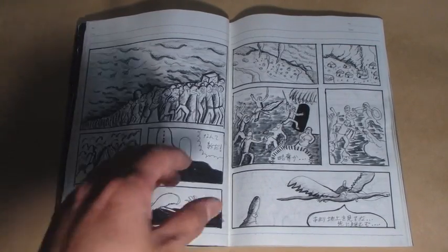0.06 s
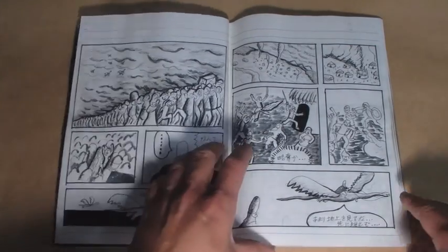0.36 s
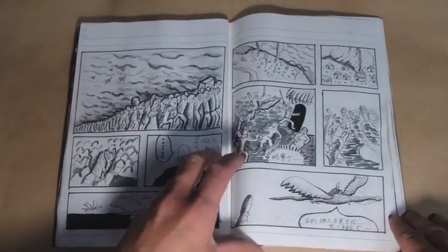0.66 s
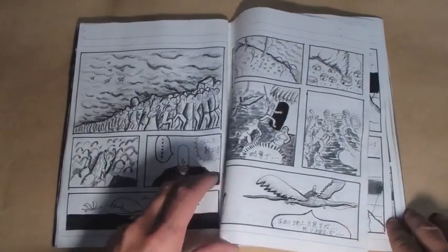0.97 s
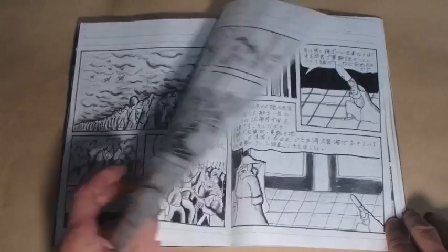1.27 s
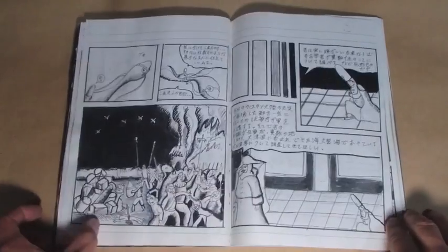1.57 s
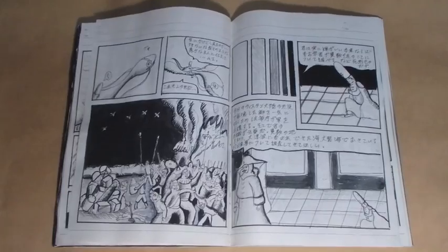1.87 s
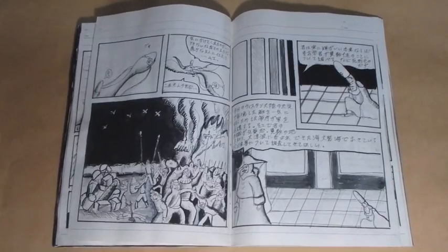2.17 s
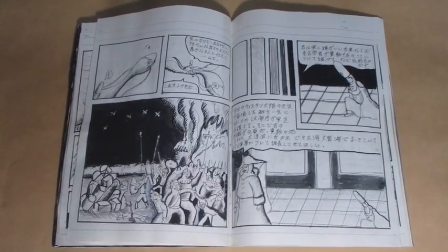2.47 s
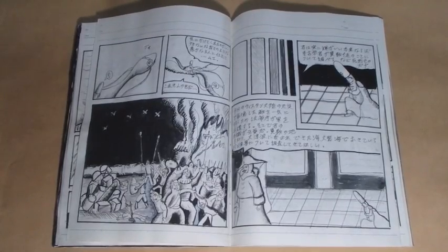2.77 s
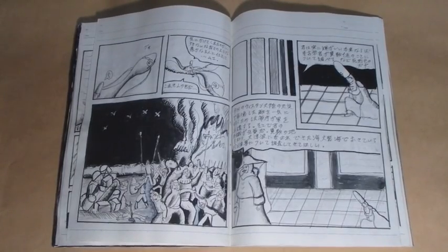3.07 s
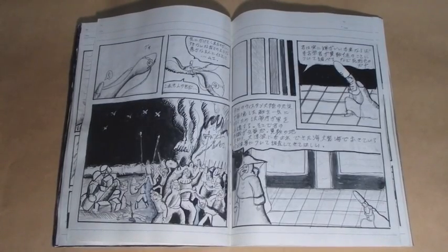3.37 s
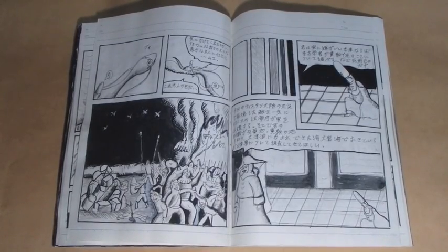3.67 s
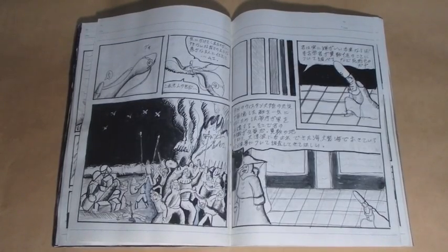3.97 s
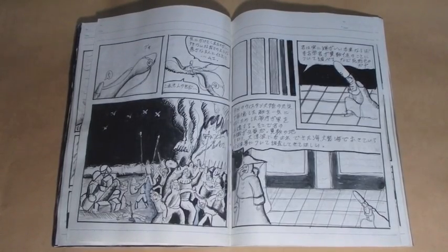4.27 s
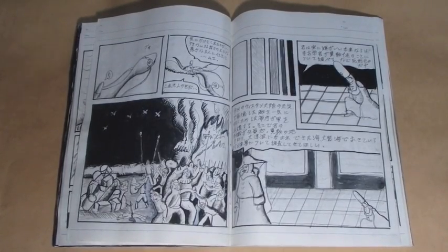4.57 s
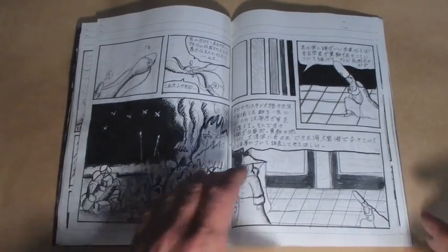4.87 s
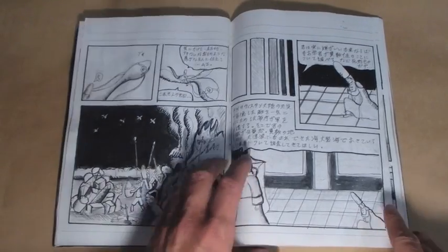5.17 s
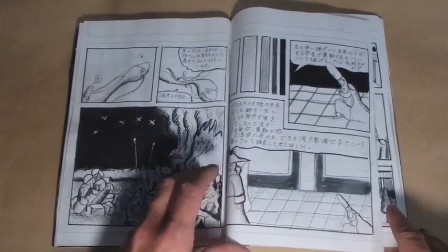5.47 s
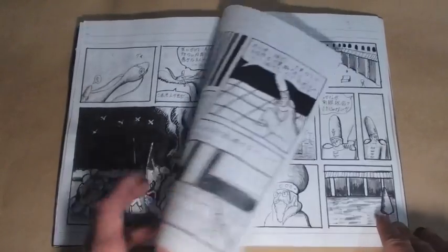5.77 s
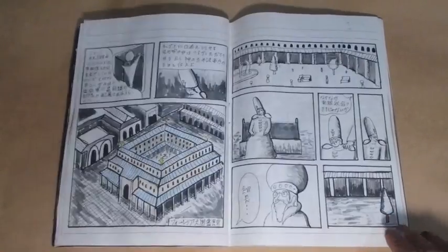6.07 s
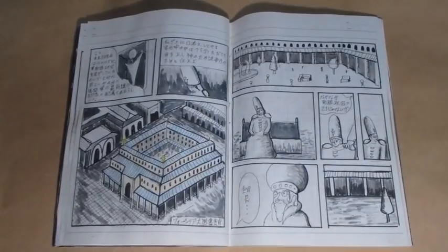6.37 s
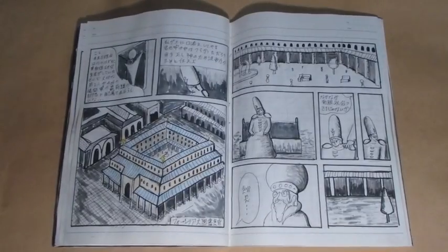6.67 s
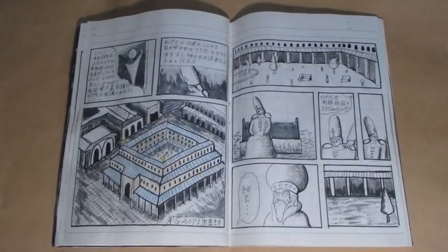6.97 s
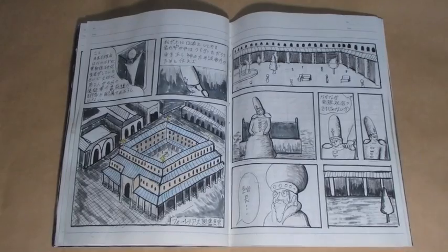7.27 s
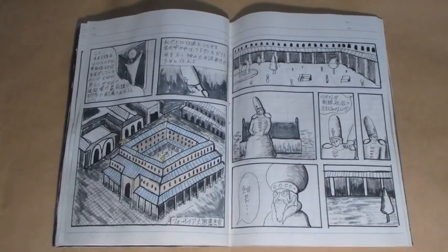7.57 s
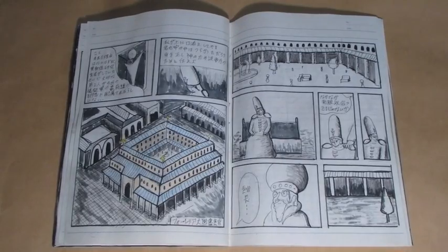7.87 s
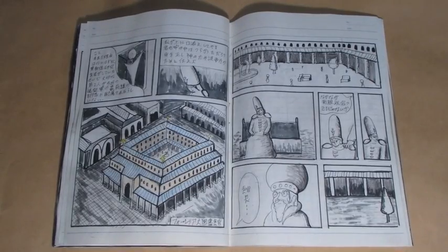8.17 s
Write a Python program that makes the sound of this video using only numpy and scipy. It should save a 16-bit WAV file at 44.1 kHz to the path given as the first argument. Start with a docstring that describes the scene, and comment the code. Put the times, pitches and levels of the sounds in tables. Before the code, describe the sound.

Two paper notebook pages are turned up close with crisp snaps and crackle, with faint camera focus ticking between them over a low room hum.

```python
"""Over the low hum of a small quiet room, a notebook page is turned on a table, close to a camera.
The sheet slides, buckles with sharp snaps and fine crackle, lands at 1.6 s and settles.
The camera's focus drive ticks faintly until a second page is turned, from about 5.3 s to 6.2 s.
The ticking then resumes, and a distant rumble swells towards the end."""
import sys
import numpy as np
from scipy import signal
from scipy.fft import rfft, irfft, next_fast_len
from scipy.io import wavfile
from scipy.ndimage import uniform_filter1d, map_coordinates

SR = 44100
rng = np.random.default_rng(int(sys.argv[2]) if len(sys.argv) > 2 else 0)


def dump_mix(stems):
    """Bounce the given channels to the path in sys.argv[1] as a 16-bit WAV at rate SR."""
    frames = np.atleast_2d(stems).T  # one column per channel
    limited = np.clip(frames, -1, 1)  # hard clip at full scale
    pcm = np.round(limited * 32767).astype(np.int16)
    wavfile.write(sys.argv[1], SR, pcm)


N = 362785
TIME = np.arange(N) / SR

# Page turns. Each row: times of grip, lift, swing and landing in seconds, seconds pressed flat,
# then relative levels in dB of bending in the grip, bending in the swing and sliding.
TURNS = [(0.57, 1.048, 1.3, 1.581, 0.029, -52, -33, -41), (5.28, 5.804, 5.96, 6.17, 0.067, -48, -35.5, -42)]
# Coherence of the paper's sound. Each row: frequency in Hz, left-right correlation.
PAPER_COHERENCE = [(500, 1), (2000, 1), (3500, 0.37), (6000, 0.15), (12000, 0.18)]
# Coherence of the background. Each row: frequency in Hz, left-right correlation.
AIR_COHERENCE = [(60, 0.68), (150, 0.78), (380, 0.53), (950, 0.32), (2380, 0.19), (5980, 0.032),
                 (15000, 0.02)]


def snaps(ring_db, flap_db, crack_db, shiver_db, size=4096):
    """Snap-through buckling: the curved sheet pops, rings, cracks and flaps into the page stack."""
    # Each row: start in seconds, relative level in dB, then flap and crack in dB against that level.
    buckles = [(0.5432, -30.5, -7, -11), (0.575, -17.5, -13.5, -26), (0.611, -20, -10, -16),
               (0.659, -30.5, -5, -22), (0.74, -33, -13, -3.5), (0.9658, -27.5, -4.5, -3.5),
               (1.0314, -25, -11.5, -22), (1.0727, -14.5, -21, -7.5), (1.131, -26, -4.5, -24),
               (1.151, -29.5, -3, -19), (1.252, -27, -6.5, -23), (1.261, -15, -17, -33),
               (1.269, -20, -5, -25), (1.292, -26.5, -3.5, -11), (1.3065, -7.5, -27, -9),
               (1.343, -22, -21, -16), (1.363, -20.5, -9, -17), (1.403, -21, -14, -10.5),
               (1.46, -28, -3, -15), (1.469, -25, -1.5, -27), (1.5187, -20.5, -24, 2),
               (1.5328, -13, -17.5, -4.5), (1.554, -19, -20, -9), (1.612, -26, -10, -16),
               (1.647, -16, -16, -20), (1.653, -16.5, -14, -9.5), (1.6635, -17.5, -10.5, -12),
               (1.7029, -11.5, -22, -16), (1.718, -21, -9.5, -20), (1.7353, -10.5, -20, -4),
               (1.91, -12, -18, -28), (1.99, -22, -4.5, -39), (2.124, -45.5, 1, -29),
               (5.242, -32.5, -12, -13), (5.278, -38, 3.5, -11), (5.2878, -32.5, -2, -26),
               (5.303, -32.5, -7, -23), (5.327, -37, 5.5, -17), (5.339, -15, -16.5, -30),
               (5.3603, -19, -9, -16), (5.391, -29.5, -8, -25), (5.408, -35.5, 4, -20),
               (5.7587, -20.5, -13, -16), (5.8003, -27.5, -7, -29), (5.8233, -22, -9, -42),
               (5.855, -33, -10, -30), (5.869, -21.5, -8.5, -36), (5.877, -19.5, -9, -29),
               (5.892, -10, -11, -18.5), (5.898, -18.5, -25, -27), (5.9149, -7.5, -18, -10),
               (6.0851, -26, -15, -33), (6.167, -26.5, -23, -14), (6.186, -24.5, -28, -16),
               (6.2065, -16.5, -34, -28), (6.2305, -26, -21, -22), (6.251, -27, -17, -29),
               (6.262, -23.5, -9, -37), (6.2939, -15.5, -15, -26), (6.2994, -9, -23, -13)]
    # Spectra of the sheet and of a snap's sharp edge. Each row: frequency in Hz, gain in dB.
    paper_spectrum = [(88, -47), (150, -18), (189, -15), (318, -15), (525, -3.5), (818, -6), (1070, -7),
                      (2700, 2), (3030, -3), (3750, -4.5), (4540, -17.5), (5200, -5.5), (6300, -25),
                      (10400, -19), (15000, -42.5)]
    crack_spectrum = [(2500, -79), (4400, -3.5), (5300, 10), (7500, 0), (10500, -6.5), (12000, -13.5),
                      (15000, -18)]
    snap_emphasis = [(300, -14.5), (600, -13), (900, -6.5), (1350, 4), (2600, -5), (3300, 1),
                     (3900, 2), (5200, -8.5), (9000, -34.5)]
    # Modes of the page stack on the table. Each row: frequency in Hz, width in Hz, gain in dB.
    stack_modes = [(310, 124, -12.5), (608, 74, -9.5), (822, 260, 2.5), (1333, 370, 0)]
    held_t60_s, free_t60_s = 0.023, 0.042
    typical_db, t60_halving_db = -21.5, 31
    resonance_db, resonance_octaves = 14.5, 0.68
    hz = np.fft.rfftfreq(size, 1 / SR)
    octave = np.log2(hz + 1)
    stack_gain = sum(amp(db) / (1 + ((hz - f) / (width / 2)) ** 2) for f, width, db in stack_modes)
    stack = 20 * np.log10(stack_gain)
    sheet = along(paper_spectrum, hz) + along(snap_emphasis, hz)
    out = np.zeros(N)
    for s, db, flap, crack in list(buckles) + creases():
        # Softer cracks ring lower, as do wide buckles, which flap more.
        ring_hz = 2736 * 2 ** (0.0075 * crack - 0.0055 * flap)
        resonance = resonance_db * np.exp(-((octave - np.log2(ring_hz)) / resonance_octaves) ** 2)
        ring_t60 = held_t60_s + (free_t60_s - held_t60_s) * freedom(s)
        ring_t60 *= 2 ** ((typical_db - db) / t60_halving_db)  # a harder pop is over sooner
        ripple_db = 0.04 * map_coordinates(rng.standard_normal(80), [5 * octave])
        ring = struck(kick(ring_t60, slips_db=8), sheet + resonance + ripple_db)
        thud = struck(kick(t60=0.045, slips_db=8), stack + ripple_db)
        edge = struck(kick(t60=0.011, slips_db=5), along(crack_spectrum, hz))
        shiver = struck(kick(t60=0.1, slips_db=25), sheet)  # bending waves cross the whole sheet
        pop = amp(ring_db) * ring + amp(flap + flap_db) * thud + amp(shiver_db) * shiver
        add(out, s, amp(db) * pop)
        # The crack comes a moment later, as the buckle passes its tightest bend.
        add(out, s + 0.0005, amp(db + crack + crack_db) * edge)
    return out


def creases(per_second=15, scatter_db=3):
    """Small buckles grow with the bending. Each row: start in seconds, level, flap and crack in dB."""
    typical_crease_db, typical_bend_db = -42.5, -44.5
    rows = []
    for turn in TURNS:
        grip, _, _, land = turn[:4]
        bend = bending(turn)
        slots = np.arange(grip, land, 1 / per_second)
        for slot, (late, strength) in zip(slots, rng.random((len(slots), 2))):
            s = slot + late / per_second
            db = typical_crease_db + 0.96 * (bend[round(s * SR)] - typical_bend_db)
            db += scatter_db * (2 * strength - 1)
            flap = -11.5 * freedom(s)  # a swinging sheet hardly touches the stack
            rows.append((s, db, flap, -17))
    return rows


def bending(turn):
    """Flexure of the sheet in dB: it slackens at the top of the arc and tightens on landing."""
    *_, hold_s, grip_db, swing_db, _ = turn
    lift_db, upright_db, landing_db = -45.5, swing_db - 4.5, swing_db + 2
    levels = [grip_db, lift_db, swing_db, upright_db, landing_db]
    return stages(turn, levels, fall_db_per_s=138, hold_s=hold_s)


def freedom(s):
    """Contact damps the sheet: 0 while it is held or at rest, 1 while it swings free."""
    settle_s = 0.39
    return sum(np.interp(s, [lift, swing, land, land + settle_s], [0, 1, 1, 0])
               for _, lift, swing, land, *_ in TURNS)


def stages(turn, levels, fall_db_per_s, hold_s=0):
    """Envelope of a turn in dB: a quick grip, a level at each stage, exponential decay after landing."""
    grip, lift, swing, land = turn[:4]
    onset_db = -20 * np.maximum(grip - TIME, 0) / 0.07
    decay_db = -fall_db_per_s * np.maximum(TIME - land - hold_s, 0)
    return np.interp(TIME, [grip, lift, swing, (swing + land) / 2, land], levels) + onset_db + decay_db


def rustle(bend_db, slide_db, flutter_db, waft_db):
    """Stick-slip friction: bending fibres crackle and the sliding face hisses, as the sheet wafts air."""
    # Spectra of bending, sliding and displaced air. Each row: frequency in Hz, gain in dB.
    crackle_spectrum = [(120, -47.5), (200, -19), (512, -9), (573, -6), (985, -5), (1100, -16.5),
                        (1200, -6), (2700, -0.5), (3030, -2.5), (3750, 2), (4510, -24), (4990, -10.5),
                        (6000, -20.5), (7800, -53), (13200, -120)]
    hiss_spectrum = [(2500, -44.5), (4500, -4), (5600, 5.5), (8000, 2), (10800, 4), (11800, -7),
                     (16000, -28)]
    waft_spectrum = [(100, 1.5), (200, -6), (330, 0), (550, -4.5), (1200, -25), (3000, -50)]
    # Relative sliding level in dB when gripped, lifted, swinging, upright and landing.
    slide_stages_db = [-17.5, -13, -5, -4, 1]
    crackle = stereo(grains(per_second=1100, spread_db=3.5, rub=1), crackle_spectrum, PAPER_COHERENCE)
    waft = stereo(rng.standard_normal((2, N)), waft_spectrum, PAPER_COHERENCE)
    hiss = stereo(grains(per_second=2000, spread_db=2.5, rub=1.8), hiss_spectrum, PAPER_COHERENCE)
    out = np.zeros((2, N))
    for turn in TURNS:
        sliding = turn[-1] + stages(turn, slide_stages_db, fall_db_per_s=150)
        out += (crackle + amp(waft_db) * waft) * amp(bend_db + bending(turn))
        out += hiss * amp(slide_db + sliding)
    return out * amp(flutter_db * wobble(60))


def grains(per_second, spread_db, rub):
    """Shot noise: tiny fibre slips of very unequal size, over a smooth rub."""
    slipping = rng.random(N) < per_second / SR
    strength = amp(spread_db * np.minimum(rng.exponential(size=N), 3))
    slips = unit(slipping * strength * rng.standard_normal((2, N)))
    return slips + rub * rng.standard_normal((2, N))


def fingers(level_db):
    """Sliding friction: skin rubs the paper in short, smooth strokes."""
    # Each row: middle of the stroke in seconds, relative peak in dB, length in seconds.
    strokes = [(0.558, -43.5, 0.023), (0.845, -57, 0.036), (5.265, -44.5, 0.025), (5.506, -45, 0.066),
               (5.667, -50.5, 0.068), (7.633, -51.5, 0.051)]
    # Spectrum of skin on paper. Each row: frequency in Hz, gain in dB.
    skin_spectrum = [(600, -20), (2000, -1), (2700, 8), (3900, 3.5), (4500, -11), (5400, -1), (6500, -18),
                     (12000, -20)]
    pressure = sum(amp(db) * np.exp(-(2 * (TIME - s) / length) ** 2) for s, db, length in strokes)
    return amp(level_db) * pressure * stereo(rng.standard_normal((2, N)), skin_spectrum, PAPER_COHERENCE)


def room(x, early_db, early_t60, tail_db):
    """Reverberation: early reflections from the table and near walls, then a diffuse tail."""
    # Each row: frequency in Hz, reverberation time in seconds.
    decay_times = [(200, 0.24), (1000, 0.31), (3500, 0.39), (6000, 0.13), (14000, 0.094)]
    # Spectrum of the reflections. Each row: frequency in Hz, gain in dB.
    wall_spectrum = [(100, 3), (4000, -7), (5200, -5.5), (7000, -7), (12000, -13)]
    hz, t, noise = signal.stft(rng.standard_normal((2, SR // 2)), SR, nperseg=256)
    tail = signal.istft(noise * amp(-60 * t / along(decay_times, hz)[:, None]), SR, nperseg=256)[1]
    t = np.arange(tail.shape[1]) / SR
    early = rng.standard_normal(tail.shape) * amp(-60 * t / early_t60)
    response = amp(early_db) * early / np.linalg.norm(early[0])
    response += amp(tail_db) * tail / np.linalg.norm(tail[0])
    delayed = np.pad(x, (SR // 250, 0))  # 4 ms
    wet = signal.fftconvolve(delayed[None], response, axes=1)[:, :N]
    return stereo(wet, wall_spectrum, PAPER_COHERENCE) * np.sqrt(np.mean(wet ** 2))


def ports(x, lead_s):
    """Time and level differences: sound reaches the left microphone port first, and with more treble."""
    # Each row: frequency in Hz, left minus right level in dB.
    left_excess = [(500, 0), (1300, 0), (2400, -0.5), (3400, 3), (4400, 7.5), (6000, 16), (8000, 16.5),
                   (12000, 15.5), (15000, -5)]
    # Resonances of the ports. Each row: frequency in Hz, gain in dB.
    resonances = [(500, -3), (2200, -4), (2700, -1), (3050, -7.5), (3800, 0.5), (4500, 1.5), (5400, -4),
                  (7000, -3.5)]
    half = np.array([[0.5], [-0.5]])

    def response(hz):
        gain = amp(half * along(left_excess, hz) + along(resonances, hz))
        return gain * np.exp(2j * np.pi * hz * half * lead_s)
    return filtered(x, response)


def focus_drive(step_s, idle_db, offbeat_db, fade_db_per_s, size=4096):
    """Impact excitation: even steps of the focus drive, strong and weak in turn, ring its housing."""
    # Spectrum of the housing. Each row: frequency in Hz, gain in dB.
    housing_spectrum = [(500, -34), (1000, -11), (1300, 4.5), (1600, -10.5), (1900, 0.5), (2500, -13),
                        (3600, -8), (4400, -12), (5500, -32.5)]
    # The lens hunts for focus. Each row: start and end in seconds.
    hunts = [(2.289, 5.05), (6.626, 8.23)]
    # The drive pushes harder. Each row: start in seconds, length in seconds, level in dB above idle.
    pushes = [(2.29, 0, 13.5), (2.823, 0, 8), (3.224, 0.42, 6), (4.425, 0.4, 6.5), (7.427, 0.36, 6.5)]
    housing = along(housing_spectrum, np.fft.rfftfreq(size, 1 / SR))
    out = np.zeros(N)
    for start, end in hunts:
        for step, s in enumerate(np.arange(start, end, step_s)):
            tick = struck(kick(t60=0.02, slips_db=-6), housing)
            push_db = [db - fade_db_per_s * max(at - s, s - at - length, 0) for at, length, db in pushes]
            add(out, s, tick * amp(idle_db + max(0, *push_db) + offbeat_db * (step % 2)))
    return out


def rumble(waver_db):
    """Tones in broadband noise: a distant droning rumble that swells late."""
    # Spectrum of the noise. Each row: frequency in Hz, gain in dB.
    spectrum = [(18, -37), (30, -6), (163, -4), (296, -15), (485, -16), (517, -17.5), (563, -14),
                (744, -23), (1190, -26), (1380, -15), (1540, -26), (2690, -19.5), (5000, -32),
                (6500, -60.5), (11000, -120)]
    # Droning tones. Each row: frequency in Hz, level in dB relative to the noise.
    drone = [(120, -9), (160, -6.5), (186, -10.5)]
    # The swell. Each row: time in seconds, level in dB.
    swell = [(0, -74), (6, -55.5), (7.7, -53.5), (7.95, -47), (8.23, -44)]
    noise = stereo(rng.standard_normal((2, N)), spectrum, AIR_COHERENCE)
    return (noise + tones(drone, waver_db)) * amp(np.interp(TIME, *np.transpose(swell)))


def hum(waver_db):
    """Narrowband sound: two low tones waver throughout."""
    # Each row: frequency in Hz, level in dB.
    partials = [(43.1, -66.5), (83, -65)]
    return tones(partials, waver_db)


def room_air(level_db):
    """The noise floor: still room air and microphone hiss."""
    # Each row: frequency in Hz, gain in dB.
    spectrum = [(13, -34), (22, -3.5), (38, -1), (152, -2), (366, -10.5), (771, -15.5), (1300, -17),
                (1620, -17.5), (1860, -17), (2140, -19), (3510, -18), (5030, -20), (13600, -20),
                (14700, -28.5), (16000, -49.5)]
    return amp(level_db) * stereo(rng.standard_normal((2, N)), spectrum, AIR_COHERENCE)


def tones(partials, waver_db):
    """Amplitude and phase modulation: sinusoids drift at random about their given rms levels."""
    out = np.zeros(N)
    for hz, db in partials:
        amplitude = np.sqrt(2) * amp(db + waver_db * wobble(5))
        out += amplitude * np.sin(2 * np.pi * hz * TIME + 0.65 * wobble(13))
    return out


def kick(t60, slips_db, size=4096):
    """Impulsive force: a sudden push, then smaller slips that fall 60 dB in t60 seconds."""
    t = np.arange(size) / SR
    slips = rng.standard_normal(size) * amp(-60 * t / t60)
    return (t == 0) + amp(slips_db) * slips / np.linalg.norm(slips)


def struck(force, gain_db):
    """Minimum-phase response of a body to a force, scaled so that its loudest 3 ms have rms 1."""
    cepstrum = irfft(np.log(amp(gain_db)))
    half = len(cepstrum) // 2
    cepstrum[1:half] *= 2
    cepstrum[half + 1:] = 0
    sound = irfft(rfft(force) * np.exp(rfft(cepstrum)))
    peak_power = uniform_filter1d(sound ** 2, 128, mode="constant").max()
    return sound / np.sqrt(peak_power + 1e-20)


def stereo(pair, spectrum, coherence):
    """Partial coherence: two unrelated signals, coloured as mid and side, give left and right, rms 1."""
    def response(hz):
        angle = np.arccos(np.clip(along(coherence, hz), -1, 1)) / 2
        return amp(along(spectrum, hz)) * [np.cos(angle), np.sin(angle)]
    mid, side = filtered(pair, response)
    return unit(np.array([mid + side, mid - side]))


def filtered(x, response):
    """Linear filtering: the spectrum of x times a function of frequency."""
    size = next_fast_len(N + SR // 4)
    return irfft(rfft(x, size) * response(np.fft.rfftfreq(size, 1 / SR)), size)[..., :N]


def wobble(knots_per_s):
    """Smooth random modulation: a spline through Gaussian knots."""
    return map_coordinates(rng.standard_normal(int(N * knots_per_s / SR) + 4), [TIME * knots_per_s])


def along(points, hz):
    """Interpolation of (Hz, value) points on a logarithmic frequency axis."""
    frequencies, values = np.transpose(points)
    return np.interp(np.log(hz + 1), np.log(frequencies + 1), values)


def add(track, s, sound):
    """Superposition of a sound on the track, starting at s seconds."""
    part = track[..., max(round(s * SR), 0):][..., :sound.shape[-1]]
    part += sound[..., :part.shape[-1]]


def amp(db):
    """Amplitude ratio of a level in decibels."""
    return 10 ** (np.asarray(db) / 20)


def unit(x):
    """Normalisation to rms 1."""
    return x / np.sqrt(np.mean(x ** 2) + 1e-20)


def scene():
    """Superposition: paper and reflections at the two ports, the focus ticks and the background."""
    pops = snaps(ring_db=3, flap_db=3, crack_db=-1.5, shiver_db=-16)
    paper = pops + rustle(bend_db=2, slide_db=-2, flutter_db=2.5, waft_db=-16.5) + fingers(level_db=7)
    reflections = room(pops, early_db=-12, early_t60=0.098, tail_db=-18.5)
    ticks = focus_drive(step_s=0.06674, idle_db=-47.5, offbeat_db=-16, fade_db_per_s=66)
    background = room_air(level_db=-48.49) + rumble(waver_db=5) + hum(waver_db=5)
    return ports(paper + reflections, lead_s=40e-6) + ticks + background


def record(dry):
    """Clipping and band limiting: peaks are cut near full scale, then a steep low-pass follows."""
    cutoff_hz = 15300
    return filtered(np.clip(dry, -0.92, 0.92), lambda hz: 1 / np.sqrt(1 + (hz / cutoff_hz) ** 100))


dry = scene()
out = record(dry)
dump_mix(out)
```